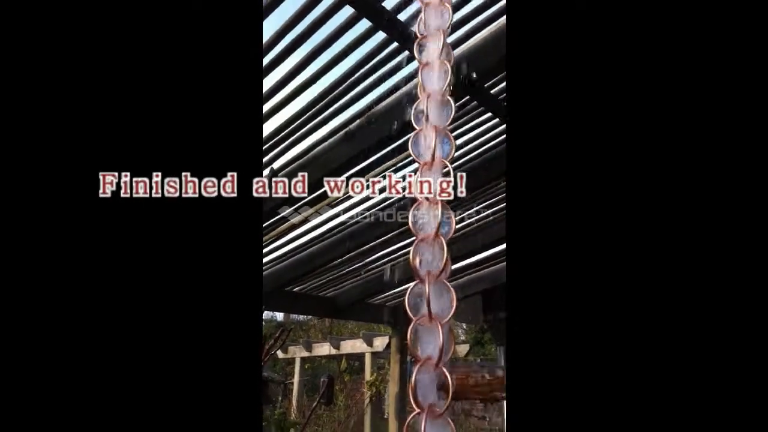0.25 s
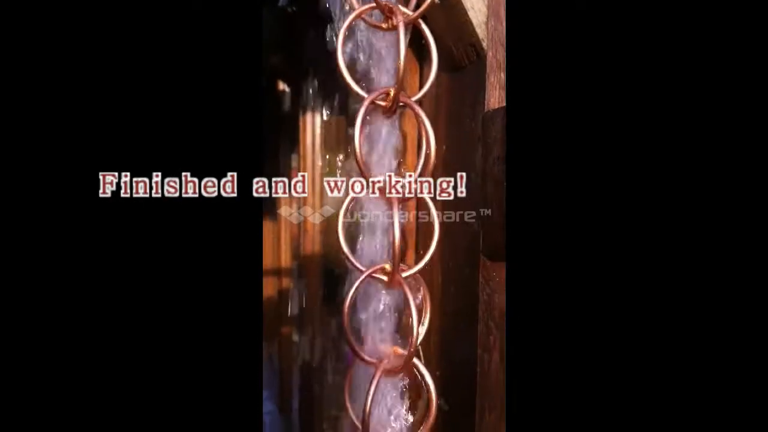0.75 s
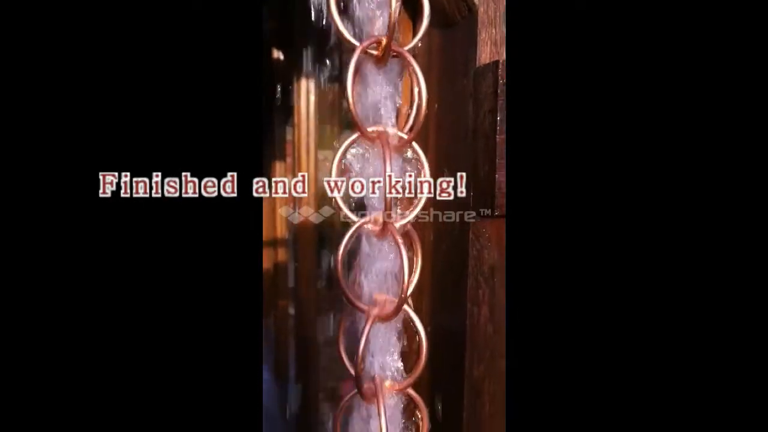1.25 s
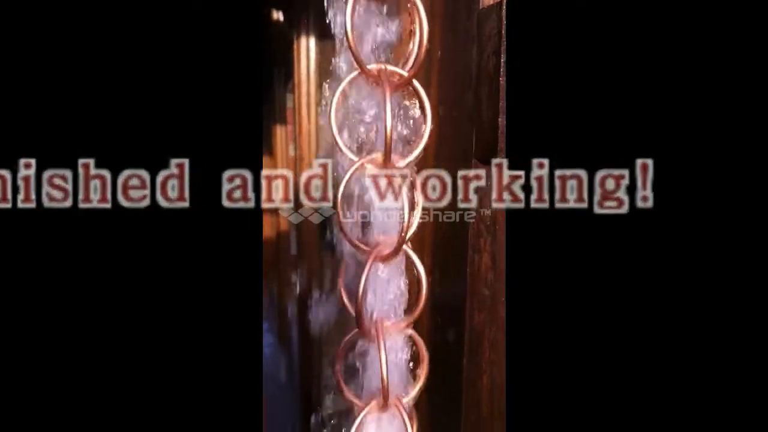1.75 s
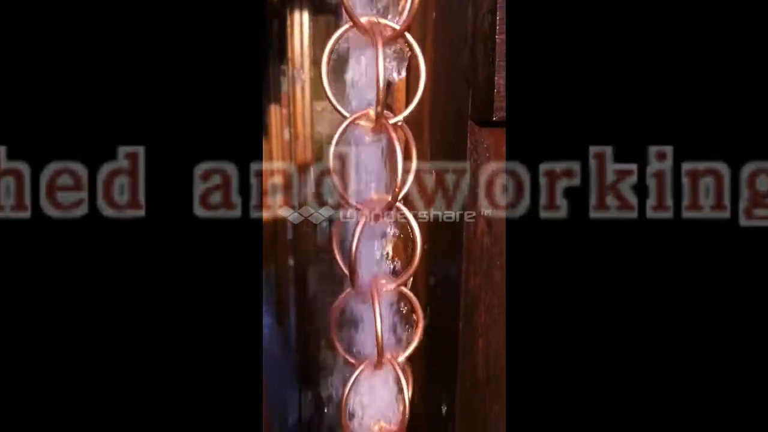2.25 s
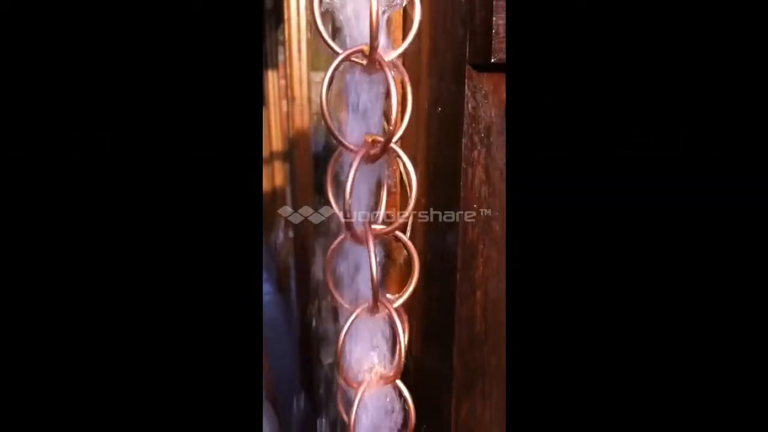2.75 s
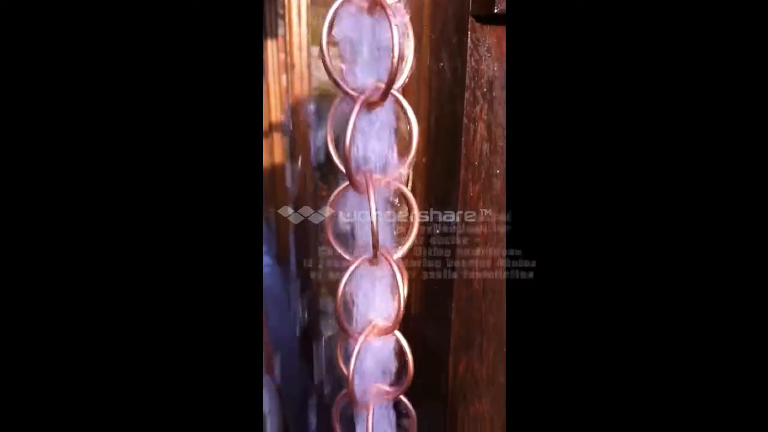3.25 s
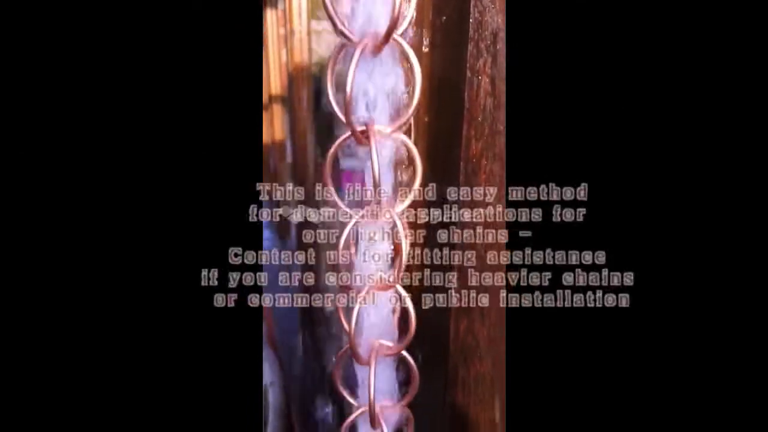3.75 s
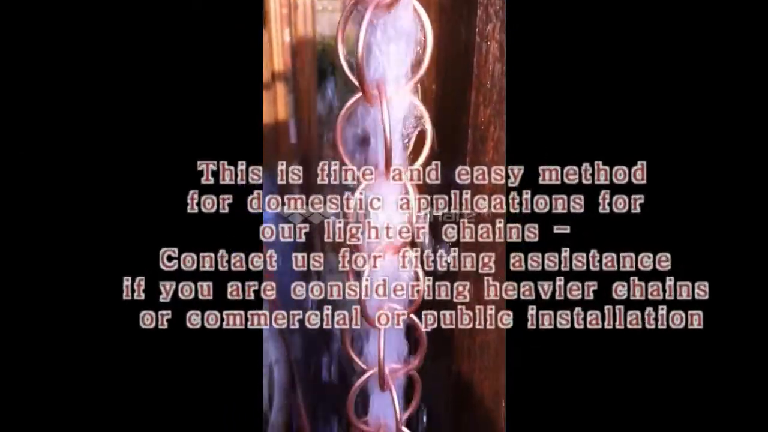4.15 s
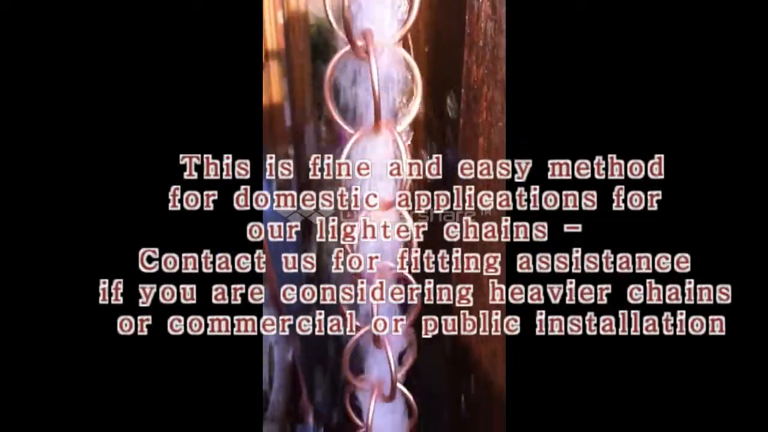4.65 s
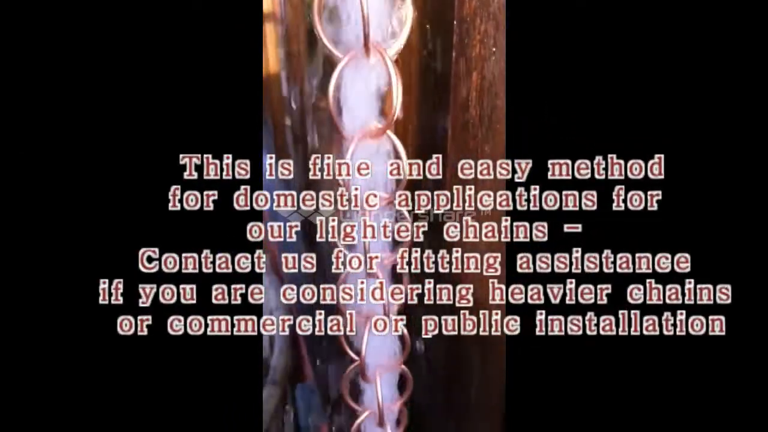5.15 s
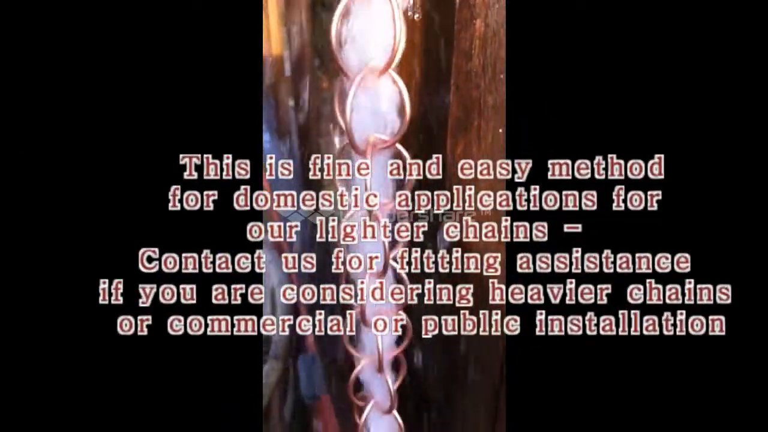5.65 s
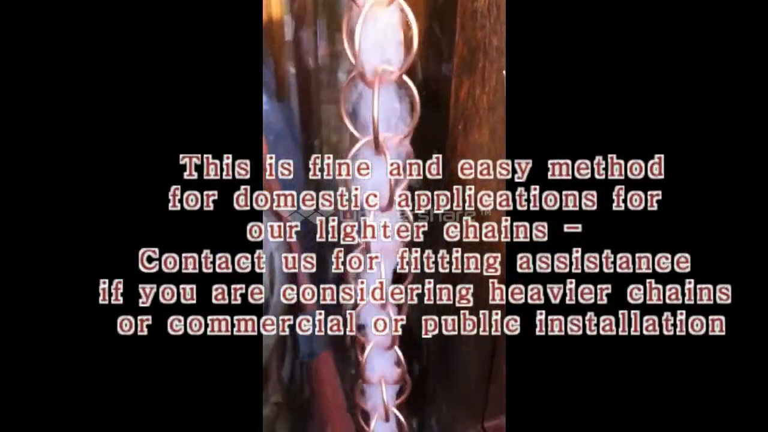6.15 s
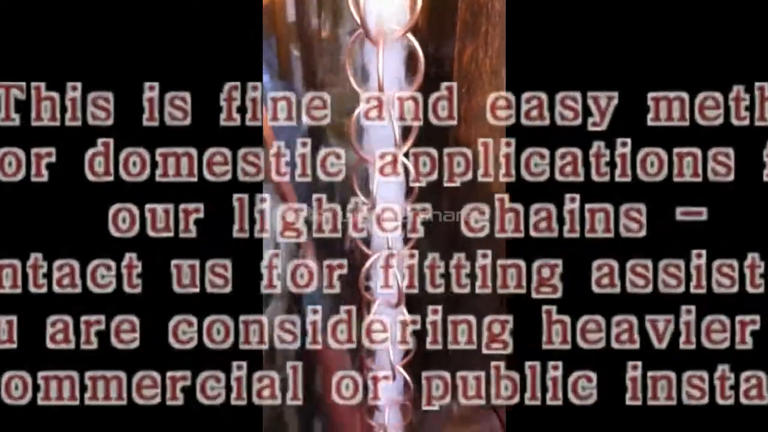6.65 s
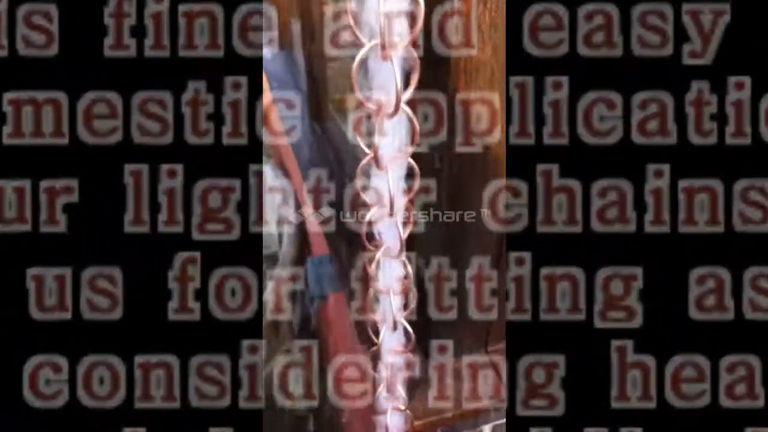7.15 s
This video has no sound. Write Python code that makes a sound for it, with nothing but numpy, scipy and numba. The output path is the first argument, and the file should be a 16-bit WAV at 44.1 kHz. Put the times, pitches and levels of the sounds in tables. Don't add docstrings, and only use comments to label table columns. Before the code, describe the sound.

A brief distant gush with basin thuds cuts out, then a loud crack opens a close steady stream of hissing spray and ticking drops.

```python
import sys
import numpy as np
from scipy import signal
from scipy.fft import rfft, irfft, next_fast_len
from scipy.io import wavfile
from scipy.ndimage import uniform_filter1d
from numba import njit

SR = 44100
rng = np.random.default_rng(int(sys.argv[2]) if len(sys.argv) > 2 else 0)


def makeup_ratio(level_db):
    decades = np.asarray(level_db, float) / 20
    return 10 ** decades


def output_pcm(signal):
    pcm = np.clip(np.atleast_2d(signal).T, -1, 1) * 32767
    wavfile.write(sys.argv[1], SR, np.round(pcm).astype(np.int16))


N = 326781

STEP_DOWN_S, FAR_END_S, NEAR_START_S = 0.342, 0.347, 0.3793
DROP_DELAY_S = 0.0007


def level(x, db):
    return x * makeup_ratio(db) / np.sqrt(np.mean(x ** 2))


def colour(x, points):
    size = next_fast_len(N)
    hz, db = np.transpose(points)
    f = np.maximum(np.arange(size // 2 + 1) * SR / size, 1)
    gain_db = np.interp(np.log(f), np.log(hz), db)
    return irfft(rfft(x, size) * makeup_ratio(gain_db), size)[:N]


def band(x, low_hz, high_hz, order=2):
    edges_hz = [low_hz, min(high_hz, 0.45 * SR)]
    return signal.sosfilt(signal.butter(order, edges_hz, "band", fs=SR, output="sos"), x)


def smooth_filter(x, order, hz, kind):
    return signal.sosfiltfilt(signal.butter(order, hz, kind, fs=SR, output="sos"), x)


def walk(rate, count=2000):
    hold = int(SR / rate)
    steps = np.repeat(rng.standard_normal(count)[:N // hold + 1], hold)[:N]
    return 1.3 * uniform_filter1d(uniform_filter1d(steps, hold), hold)


@njit
def ring(start, hz, cycles, size, glide, count):
    out = np.zeros(count)
    for g in range(len(start)):
        step = 2 * np.pi * hz[g] / SR
        fade = np.exp(-hz[g] / SR / cycles[g])
        bend = 1 + glide * hz[g] / SR / cycles[g]
        a, rise, phase, i = size[g], 1., 0., start[g]
        while i < count and a > .004 * size[g]:
            rise *= np.exp(-step / 5)
            out[i] += a * (1 - rise) * np.sin(phase)
            phase += step
            step = min(step * bend, 2.6)
            a *= fade
            i += 1
    return out


def bubbles(count, low_hz, high_hz, cycles, scatter_db, clump_db, glide, most_db=10.0):
    when, pitch, loudness, length = rng.random((count, 4)).T
    clumps = walk(45) + 0.2 * walk(12)
    clumps = clumps - uniform_filter1d(clumps, int(0.16 * SR))
    odds = np.cumsum(makeup_ratio(clump_db * clumps))
    start = np.searchsorted(odds, when * odds[-1])
    hz = low_hz + (high_hz - low_hz) * pitch
    size_db = np.minimum(-scatter_db * np.log(1 - loudness), most_db)
    size = makeup_ratio(size_db) * (hz / high_hz) ** 0.83
    return ring(start, hz, cycles * (0.34 + 1.4 * length), size, glide, N)


def stream():
    spray = rng.standard_normal(N) * makeup_ratio(0.2 * walk(17) + 1.1 * walk(70))
    crackle = bubbles(24000, low_hz=1640.0, high_hz=15240.0, cycles=0.59, scatter_db=8.5, clump_db=3.0,
                      glide=0.012)
    pings = bubbles(7000, low_hz=1938.0, high_hz=12070.0, cycles=5.74, scatter_db=2.0, clump_db=3.0,
                    glide=0.059)
    snaps = bubbles(900, low_hz=2600.0, high_hz=14700.0, cycles=1.7, scatter_db=1.0, clump_db=4.0,
                    glide=0.014)
    return spray + level(snaps, -11.5) + level(crackle, -4.0) + level(pings, -7.5)


def patches(x):
    size = next_fast_len(N)
    octave = np.log2(np.arange(1, size // 2 + 2) * SR / size / 1000)
    spectrum = rfft(x, size)
    centres = np.arange(0, 4.5, 0.5)
    out = np.zeros(N)
    for row in np.eye(len(centres)):
        share = np.interp(octave, centres, row)
        swell_db = 0.25 * walk(9) + 1.0 * walk(35)
        out += irfft(spectrum * share, size)[:N] * makeup_ratio(swell_db)
    return out


def flow(t):
    # time_s, splash_level_db
    chain_flow = [(0.42, -30.5), (0.46, -27.5), (0.48, -29.5), (2.58, -29), (2.6, -27), (2.89, -29),
                  (2.93, -28), (3.2, -29), (3.24, -27.5), (3.42, -29), (3.77, -27), (4.02, -28.5),
                  (4.66, -27.5), (4.88, -27.5), (7.18, -28), (7.19, -28.5), (7.39, -27), (7.41, -27)]
    # middle_s, rumble_swell_db, hollow_ring_swell_db,
    # splash_swell_db
    surges = [(.14, 6, 2, -0.5), (.87, 5, 4, -1.5), (1.19, 5, -6, 2), (1.68, -1, 10, 2), (2.05, 1, -7, 0),
              (2.19, -1, -10, 0), (2.63, 6, 11, -0.5), (2.81, -1, 8, -1.5), (3.3, 5, -1, 1.8),
              (3.47, 4, 4, -1), (3.63, 1, -2, -0.7), (3.83, 0, 7, 0.7), (4.0, 2, -1, 0), (4.31, 1, 9, -0.2),
              (4.44, -4, 3, 0.5), (4.73, 5, 8, 0.5), (4.83, -2, 9, -1), (5.04, -2, 12, -0.5),
              (5.34, 3, 8, 0), (5.75, 5, 6, -1), (6.18, 1, 5, 1), (6.98, 5, 4, 0), (7.08, 3, 10, 0),
              (7.25, 2, 3, -0.5)]
    surge_s = 0.03
    far = t < FAR_END_S
    near_db = np.interp(t, *np.transpose(chain_flow)) - 3
    fuller_db = (near_db - np.mean(near_db)) * ~far
    fine_db = 0.8 - 0.013 * fuller_db - 0.5 * walk(9.8)
    swells = sum(np.outer(db, np.exp(-((t - s) / surge_s) ** 2)) for s, *db in surges)
    rumble_db = np.where(far, -56, -55) + 0.5 * walk(6.6) + swells[0]
    hollow_db = -58 + 1.5 * walk(9.7) + swells[1]
    splash_db = np.where(far, -36.5, near_db) + swells[2]
    return splash_db, fine_db, rumble_db, hollow_db


def falling_water(t, splash_db, fine_db, rumble_db):
    # pitch_hz, level_db (per Hz)
    far_tone = [(60, -35), (110, -26), (170, -1.5), (440, -4), (850, -13), (1600, -15), (3650, -16),
                (6500, -16), (10000, -19.5), (15500, -25)]
    # pitch_hz, level_db (per Hz)
    near_tone = [(30, -31), (70, -31), (105, -19.5), (140, -9.5), (220, -6), (330, -9), (620, -11),
                 (1350, -10), (2300, 0), (4000, -1), (5000, 0), (10000, 0), (11500, -2.5), (15500, -3.5)]
    white = patches(stream())
    water = np.zeros(N)
    for points, here in ((far_tone, t < FAR_END_S), (near_tone, t >= FAR_END_S)):
        x = colour(white, points)
        low = smooth_filter(x, 2, 1100, "low")
        high = smooth_filter(x, 2, 7000, "high")
        rumble = level(low, 2.86) * makeup_ratio(0.58 * rumble_db - 20.5)
        splash = level(x - low - high, -1.45) * makeup_ratio(splash_db)
        fine_spray = level(high, -0.81) * makeup_ratio(splash_db + fine_db)
        water += here * (rumble + splash + fine_spray)
    return water


def tilt(x, t):
    turn = np.interp(t, (5.7, 6.7), (0, 1))
    lifted = 0.21 * smooth_filter(x, 2, (3500, 4400), "band")
    dulled = 0.27 * smooth_filter(x, 2, (1790, 2680), "band")
    return x + turn * (lifted - dulled)


def pump(t):
    phase = 2 * np.pi * np.cumsum(142 + 2.45 * walk(11)) / SR
    return np.sqrt(2) * makeup_ratio(-59.5 + 0.85 * walk(12)) * np.sin(phase)


def basin(hollow_db):
    # start_s, peak_db, plop_pitch_hz
    slug_hits = [(0.018, -30, 235), (0.127, -29, 225), (0.132, -34, 430), (0.152, -38, 220),
                 (0.175, -29, 440), (0.229, -26.5, 450), (0.272, -30, 430), (0.295, -30, 172),
                 (0.321, -27, 455), (0.322, -29, 990), (0.714, -33, 230), (1.09, -32, 275),
                 (1.239, -34, 237), (1.359, -46, 215), (1.805, -32, 135), (2.106, -28, 455),
                 (2.25, -44, 440), (2.596, -30, 455), (2.79, -35, 450), (3.762, -34, 223), (3.8, -29, 267),
                 (4.651, -33, 143), (4.969, -43, 1080), (5.221, -28, 368), (5.585, -32, 507),
                 (6.16, -34, 455), (7.051, -42, 452), (7.13, -31, 347)]
    # pitch_hz, width_hz, level_db
    basin_tones = [
        (215, 19, -7.5),
        (370, 104, -12),
        (455, 28, -10),
        (740, 50, -15),
        (993, 50, -13),
    ]
    s, db, hz = np.transpose(slug_hits)
    start = (s * SR).astype(np.int64)
    hits = np.zeros(N)
    hits[start] = makeup_ratio(db)
    fading = signal.lfilter([1], [1, -np.exp(-1 / (0.015 * SR))], hits)
    slugs = rng.standard_normal(N) * fading
    thuds = np.zeros(N)
    for tone_hz, width_hz, tone_db in basin_tones:
        thuds += makeup_ratio(15.0 + tone_db) * band(slugs, tone_hz - width_hz / 2, tone_hz + width_hz / 2, order=1)
    plops = band(ring(start, hz, np.full(len(s), 3.0), makeup_ratio(db - 7.0), 0.004, N), 86, 3000)
    patter = band(rng.standard_normal(N), 444, 466, order=1)
    return thuds + plops + level(patter, -1) * makeup_ratio(0.68 * hollow_db - 16.5)


def puffs(t):
    # start_s, peak_db
    air_puffs = [(0.049, -60), (0.519, -65), (1.419, -65), (1.82, -64), (2.099, -62), (3.049, -64),
                 (3.549, -62), (3.679, -64), (4.199, -63), (4.299, -63), (4.399, -66), (4.729, -56),
                 (4.829, -70), (6.371, -61), (6.469, -68), (6.559, -65), (6.819, -63), (7.149, -58.5),
                 (7.379, -67)]
    puff_s = 0.028
    swell = sum(makeup_ratio(db - 1) * np.exp(-((t - s - puff_s / 2) / puff_s) ** 2) for s, db in air_puffs)
    return swell * level(band(rng.standard_normal(N), 62, 115), 0)


def drops(table, cycles, crack_cycles, crack_db, crack_s, tail_s, spread, count=40):
    s, db, hz, tail_db = (column[:, None] for column in np.transpose(table))
    u = rng.random((len(table), count))
    v = rng.standard_normal((len(table), count))
    crack = np.arange(count) < 5
    other = np.arange(count) > 0
    late_s = np.where(crack, crack_s * u, -tail_s * np.log(1 - u)) * other
    size = makeup_ratio(db + np.where(crack, crack_db * other + 7.0, tail_db))
    pitch = np.clip(hz * np.exp(spread * np.clip(v, -1.6, 1.6) * other), 1800, 15000)
    length = np.where(crack & other, crack_cycles, cycles) + 0 * u
    start = ((s + DROP_DELAY_S + late_s) * SR).astype(np.int64)
    rung = ring(start.ravel(), pitch.ravel(), length.ravel(), size.ravel(), 0.0033, N)
    return band(rung, 1560, 22000)


def with_droplets(table, trim_db, droplets_db):
    return [(s, db + trim_db, hz, droplets_db) for s, db, hz in table]


def early_drops():
    # start_s, peak_db, bubble_pitch_hz, droplets_db
    first_drops = [
        (.0929, -21, 10800, -12),
        (.1147, -18, 9500, -18),
        (.142, -11, 8900, -18),
        (.3795, -19, 12000, -16),
        (.4064, -8.5, 9900, -15),
        (.407, -9, 9300, -18),
        (.4062, -21, 5600, -20),
    ]
    return drops(first_drops, cycles=4.2, crack_cycles=2.2, crack_db=-7, crack_s=0.0004, tail_s=0.006,
                 spread=0.15)


def near_drops():
    # start_s, peak_db, bubble_pitch_hz
    small = [(0.4354, -18, 6920), (0.6958, -19, 7400), (0.7965, -17, 7480), (0.8774, -17, 8610),
             (1.5129, -20, 6850), (1.6157, -18, 8070), (1.6476, -17, 8890), (1.7184, -16, 6860),
             (1.8826, -16, 8130), (1.9235, -24, 6790), (1.9958, -17, 7630), (2.0492, -13.5, 8710),
             (2.1061, -20, 6980), (2.3854, -15, 8640), (2.4618, -23, 7290), (2.5331, -17, 8020),
             (2.6124, -21, 8260), (2.6463, -14, 7920), (2.7062, -18, 7460), (2.7301, -14, 7470),
             (2.9197, -14, 7300), (2.9771, -14, 9020), (3.4944, -23, 6770), (3.5358, -23, 7400),
             (3.687, -24, 7120), (3.7443, -17, 7140), (4.2262, -17, 9250), (4.2981, -20, 8210),
             (4.3834, -22, 7020), (4.4807, -21, 8640), (4.553, -15, 8090), (4.5924, -13, 7920),
             (4.6777, -15, 7910), (4.8713, -24, 8420), (4.9765, -22, 7940), (5.0279, -25, 9400),
             (5.1806, -20, 7950), (5.2639, -11.5, 7760), (5.3527, -18, 8280), (5.4689, -16, 8700),
             (5.6166, -18, 8790), (5.7318, -23, 8700), (5.7508, -17, 8700), (6.0172, -19, 8780),
             (6.1434, -15, 6770), (6.1913, -22, 6720), (6.3789, -24, 6700), (6.4342, -18, 6900),
             (6.4537, -17, 8680), (6.4876, -20, 7910), (6.5086, -20, 7670), (6.5829, -20, 9220),
             (6.6971, -18, 7820), (6.7241, -22, 7290), (6.7999, -13, 7600), (7.0857, -23, 6950),
             (7.1067, -17, 6620), (7.1311, -17, 7630), (7.2005, -24, 8980), (7.3526, -15, 8960)]
    # start_s, peak_db, bubble_pitch_hz
    low = [(0.4568, -29, 3730), (0.5356, -13.5, 2760), (0.6589, -29, 2570), (0.8544, -26, 3520),
           (1.1323, -23, 1990), (1.3358, -27, 2720), (1.5334, -20, 3160), (1.7404, -17, 2820),
           (1.8387, -17, 3150), (2.0098, -21, 2650), (2.0951, -24, 3380), (2.1415, -16, 3940),
           (2.1874, -20, 2570), (2.2103, -18.5, 2250), (2.3595, -20, 3780), (2.6064, -25, 2800),
           (2.7257, -28, 3520), (2.778, -23, 2790), (2.9202, -18, 3500), (3.1083, -22, 3220),
           (3.216, -15, 2920), (3.2435, -16, 2620), (3.4949, -13.5, 3110), (3.5468, -20, 2790),
           (3.5782, -14, 2780), (3.6595, -24, 3060), (3.6925, -17, 2490), (3.7593, -29, 2680),
           (3.9314, -31, 2760), (3.9843, -15, 2680), (4.354, -27, 3500), (4.3904, -12, 3810),
           (4.4732, -23, 2940), (4.9571, -23, 3350), (4.9795, -13.5, 2960), (5.0524, -15, 3730),
           (5.4001, -16, 3450), (5.9109, -16, 3500), (6.3978, -11, 3700), (6.8184, -30, 3950),
           (7.0119, -20, 3210), (7.1052, -10.5, 2880), (7.1506, -21, 3770), (7.2085, -27, 4000),
           (7.3736, -25, 3510)]
    # start_s, peak_db, bubble_pitch_hz
    fat = [(0.4598, -14, 5730), (0.544, -18, 5120), (0.5646, -17, 4580), (0.5875, -24, 5720),
           (0.6808, -25, 5000), (0.795, -19, 5880), (0.8943, -18, 5260), (0.9262, -21, 4940),
           (1.2041, -21, 5540), (1.3358, -24, 5070), (1.5543, -14, 5500), (1.6262, -19, 6340),
           (1.8297, -26, 4720), (1.8546, -19, 4480), (2.0103, -21, 5130), (2.0377, -20, 6300),
           (2.1076, -24, 5300), (2.1335, -22, 5080), (2.2926, -18, 4880), (2.4907, -19, 4970),
           (2.554, -21, 4770), (2.5875, -19, 4940), (2.613, -14, 5460), (2.7361, -14, 5740),
           (2.9182, -23, 5580), (2.9871, -12.5, 4920), (3.0786, -17, 4400), (3.2395, -18, 4560),
           (3.2589, -14.5, 5030), (3.7359, -22, 4940), (3.8331, -18, 5060), (3.894, -14, 4400),
           (3.9838, -18, 5040), (4.0935, -21, 5170), (4.1429, -22, 6160), (4.4133, -20, 5180),
           (4.5645, -16, 5140), (4.595, -13, 5600), (4.6159, -18, 5620), (4.6453, -16, 4260),
           (4.7361, -18, 6340), (4.9062, -16, 4610), (4.9541, -22, 5840), (5.0239, -23, 4660),
           (5.208, -17, 4870), (5.3547, -14, 5500), (5.3986, -27, 6000), (5.6311, -16, 5110),
           (5.7458, -22, 4170), (5.7697, -22, 6010), (5.8082, -28, 4970), (6.0172, -18, 6290),
           (6.086, -18, 6120), (6.399, -15, 5540), (6.5066, -20, 6060), (7.1053, -14, 5260),
           (7.1326, -19, 5430), (7.1531, -14, 4550), (7.2953, -24, 6130), (7.3747, -19, 4100)]
    # start_s, peak_db, bubble_pitch_hz
    fine = [(0.4598, -17, 10300), (0.5017, -23, 13200), (0.605, -17, 9750), (0.795, -16, 10600),
            (0.8774, -18, 10800), (0.9248, -19, 9560), (0.9497, -16, 9510), (0.9931, -18, 11300),
            (1.0594, -26, 11500), (1.1203, -27, 10300), (1.3598, -22, 10100), (1.5708, -17, 9940),
            (1.8212, -18, 12200), (1.8776, -20, 10500), (2.0058, -18, 9810), (2.1689, -14, 9520),
            (2.3495, -18, 13800), (2.4343, -21, 10700), (2.4618, -18, 11100), (2.5511, -19, 10600),
            (2.6124, -12, 10300), (2.8663, -21, 9740), (3.032, -22, 9650), (3.0494, -18, 9740),
            (3.1357, -12.5, 12700), (3.2345, -21, 12300), (3.4789, -20, 9870), (3.601, -19, 10200),
            (3.66, -21, 14100), (3.6895, -18, 10100), (3.7443, -15, 10300), (3.8925, -13, 9890),
            (4.1699, -22, 9990), (4.298, -11, 12600), (4.5854, -19, 11200), (4.647, -19, 9540),
            (4.6784, -9.5, 11800), (4.8199, -19, 10300), (4.9112, -18, 10600), (4.99, -20, 9890),
            (5.0385, -10, 9800), (5.4679, -16, 10300), (5.5453, -23, 9680), (5.6161, -16, 9540),
            (6.0167, -19, 10200), (6.0696, -20, 9530), (6.1125, -16, 12300), (6.2626, -19, 9850),
            (6.2766, -15, 10500), (6.403, -11, 10000), (6.4537, -15, 10100), (6.6752, -15, 9840),
            (6.7241, -16, 10500), (6.9186, -14, 10500), (7.0169, -13, 13300), (7.1436, -13, 12800),
            (7.198, -23, 11200), (7.2883, -16, 11500), (7.3082, -13, 11700), (7.396, -15, 10700)]
    every_drop = with_droplets(low, -10, -17) + with_droplets(fat, -3.5, -18)
    every_drop += with_droplets(small, -2, -17.5) + with_droplets(fine, -1, -11.5)
    return drops(every_drop, cycles=3.1, crack_cycles=1.5, crack_db=-8, crack_s=0.0004, tail_s=0.006,
                 spread=0.2)


def metal_ticks():
    # start_s, peak_db, centre_pitch_hz
    metal_snaps = [(0.4598, -10, 10300), (0.5431, -13, 5110), (0.6943, -17, 7400), (0.795, -14, 10600),
                   (0.8774, -13, 8610), (0.9248, -15, 9560), (0.9502, -16, 9510), (0.9931, -10, 5560),
                   (1.5129, -16, 6850), (1.5543, -15, 5590), (1.8776, -13, 6880), (1.9958, -15, 5100),
                   (2.0492, -10, 6290), (2.3495, -13, 12800), (2.4618, -14, 7290), (2.5331, -14, 8020),
                   (2.6124, -14, 5460), (2.6463, -13, 7920), (2.7062, -12, 9440), (2.9192, -15, 7300),
                   (2.9766, -14, 8810), (2.9866, -10, 5240), (3.0494, -12, 9740), (3.1357, -11, 12700),
                   (3.217, -15, 5930), (3.2431, -10, 5040), (3.2589, -16, 5030), (3.66, -15, 10400),
                   (3.6875, -14, 7120), (3.7446, -10, 7140), (3.8321, -14, 5050), (3.893, -13, 9400),
                   (4.0926, -16, 5180), (4.2976, -7, 12600), (4.5625, -13, 9450), (4.5924, -12, 7920),
                   (4.6453, -10, 8140), (4.6777, -9, 7910), (4.979, -15, 5110), (5.0274, -11, 10200),
                   (5.0379, -10, 9920), (5.2075, -16, 5990), (5.3532, -12, 5540), (5.4684, -14, 8700),
                   (5.6166, -14, 8790), (6.0172, -13, 6290), (6.2761, -12, 10500), (6.3784, -15, 6670),
                   (6.3978, -9, 5540), (6.4537, -12, 10100), (6.6747, -14, 8790), (6.6971, -13, 7820),
                   (6.7241, -14, 7290), (6.7984, -13, 7570), (6.9186, -12, 10500), (7.1052, -12, 5260),
                   (7.1316, -11, 5450), (7.3526, -10, 8960), (7.3741, -13, 8630), (7.395, -11, 8510)]
    return drops(with_droplets(metal_snaps, -11.5, -20), cycles=1.2, crack_cycles=0.9, crack_db=-5,
                 crack_s=0.0002, tail_s=0.004, spread=0.35)


def wall_echo(x):
    lag = int(0.0031 * SR)
    out = x.copy()
    out[lag:] += makeup_ratio(-9) * band(x, 1900, 15000)[:-lag]
    return out


def clear_pings():
    # start_s, peak_db, pitch_hz
    clear_bubbles = [(.1422, -17, 6330), (.1422, -18, 12300), (0.1417, -27, 2700), (.1148, -22, 11800),
                     (0.409, -17, 10300), (.411, -18, 7600), (1.8457, -24, 2590), (2.3595, -29, 2000),
                     (2.7243, -20, 6010), (2.7363, -20, 5000), (3.079, -19, 4840), (3.109, -19, 4900),
                     (3.117, -20, 6800), (3.267, -23, 5100), (3.3404, -21, 4890), (3.8042, -25, 2660),
                     (4.3085, -13, 10000), (4.682, -18, 12000), (4.7295, -18, 6200), (4.7367, -17, 5000),
                     (4.826, -19, 9500), (4.9591, -29, 2180), (5.0698, -27, 2400), (5.1112, -26, 2630),
                     (5.645, -24, 2260), (6.1918, -27, 2680), (6.391, -22, 7000), (6.3978, -23, 2400),
                     (6.483, -21, 7500), (6.8184, -30, 2350)]
    s, db, hz = np.transpose(clear_bubbles)
    start = ((s + DROP_DELAY_S) * SR).astype(np.int64)
    return ring(start, hz, np.full(len(s), 3.5), makeup_ratio(db + 5), 0.004, N)


def slat_whistle(t):
    along = np.interp(t, (0.144, 0.159), (0, 1))
    fall_hz = 9000 * (4400 / 9000) ** along
    swell = np.sqrt(np.sin(np.pi * along).clip(0))
    strength = makeup_ratio(-30 + 4 * walk(400, count=4000))
    return strength * swell * np.sin(2 * np.pi * np.cumsum(fall_hz) / SR)


def flecks(t):
    # middle_s, level_db, low_hz, high_hz
    hiss_flecks = [
        (2.962, -40, 5230, 6400),
        (2.962, -38, 8100, 9700),
        (4.49, -43, 6800, 8300),
    ]
    side = np.zeros(N)
    for s, db, low_hz, high_hz in hiss_flecks:
        hiss = level(band(rng.standard_normal(N), low_hz, high_hz, order=6), db)
        side += hiss * np.cos(np.clip((t - s) / 0.018, -1, 1) * np.pi / 2)
    return side * np.array([[1], [-1]])


def scene():
    t = np.arange(N) / SR
    splash_db, fine_db, rumble_db, hollow_db = flow(t)
    water = tilt(falling_water(t, splash_db, fine_db, rumble_db), t)
    big_drops = wall_echo(early_drops() + near_drops() + metal_ticks())
    middle = water + pump(t) + basin(hollow_db) + puffs(t) + big_drops + clear_pings() + slat_whistle(t)
    return np.tile(middle, (2, 1)) + flecks(t)


def thin_treble(x, t):
    # start_s, end_s, low_hz, high_hz
    missing_treble = [
        (.390, .4035, 8300, 12400),
        (.3995, .4035, 12400, 18000),
    ]
    for from_s, to_s, *hz in missing_treble:
        treble = smooth_filter(x, 8, hz, "band")
        x = x - 0.97 * treble * np.interp(t, (from_s - 0.002, from_s, to_s, to_s + 0.001), (0, 1, 1, 0))
    return x


def band_limit(x):
    return signal.sosfilt(signal.butter(12, 16660, fs=SR, output="sos"), x)


def record(dry):
    t = np.arange(N) / SR
    far_gate = np.where(t < STEP_DOWN_S, 1, makeup_ratio(-7)) * (t < FAR_END_S)
    last_fade = (t >= FAR_END_S) * makeup_ratio(-30 - 1800 * np.abs(t - FAR_END_S))
    gate = far_gate + last_fade + (t >= NEAR_START_S)
    top_cut = signal.ellip(8, 0.1, 60, 15350, fs=SR, output="sos")
    heard = signal.sosfiltfilt(top_cut, thin_treble(dry, t) * gate)
    return band_limit(heard)


dry = scene()
out = record(dry)
output_pcm(out)
```